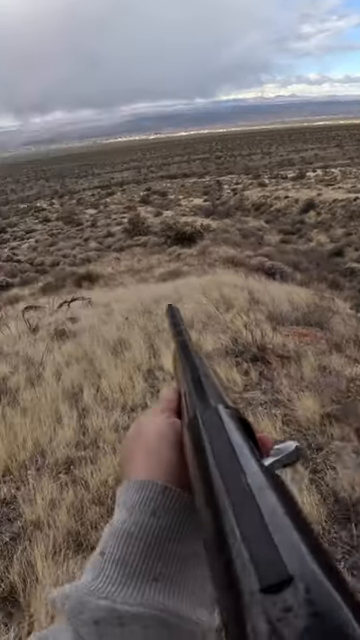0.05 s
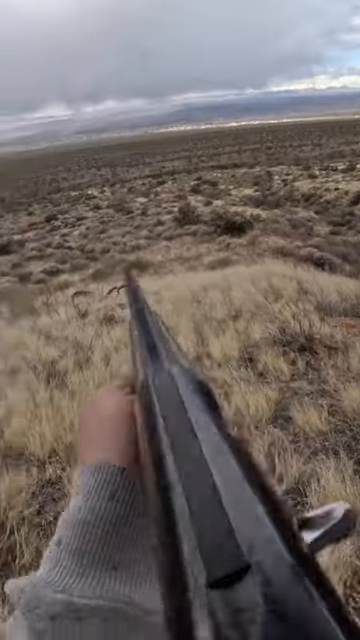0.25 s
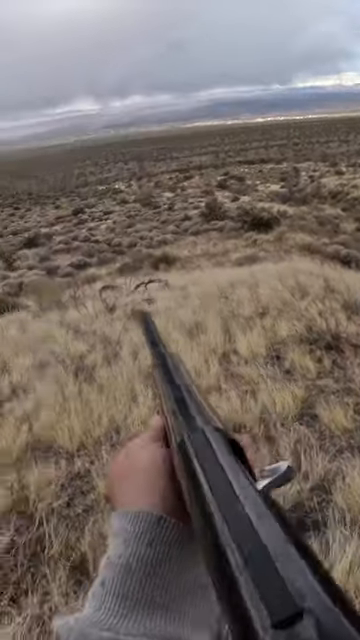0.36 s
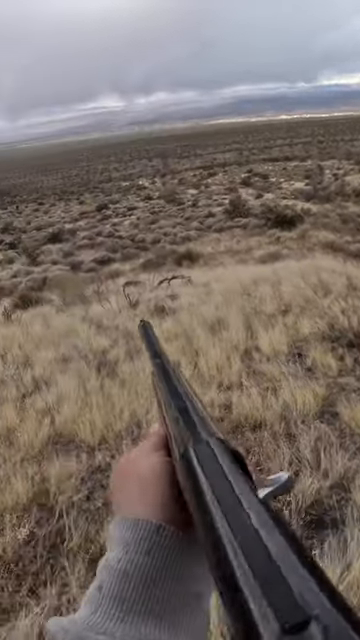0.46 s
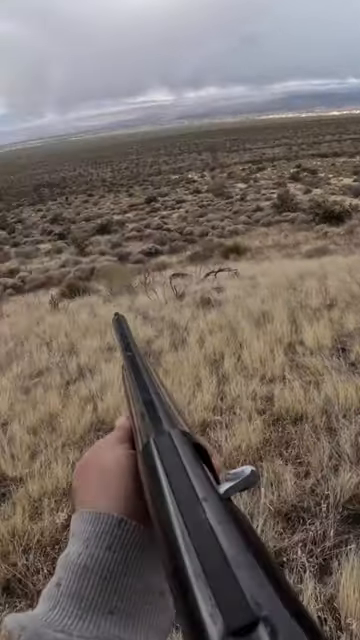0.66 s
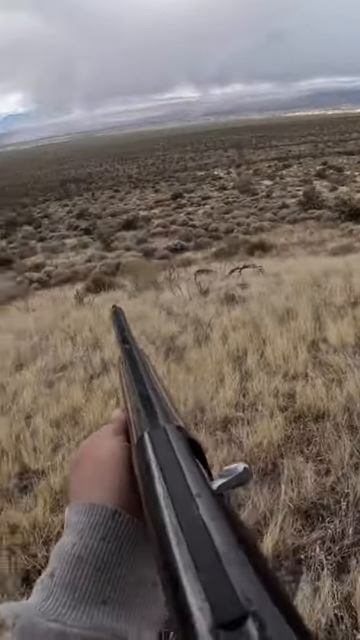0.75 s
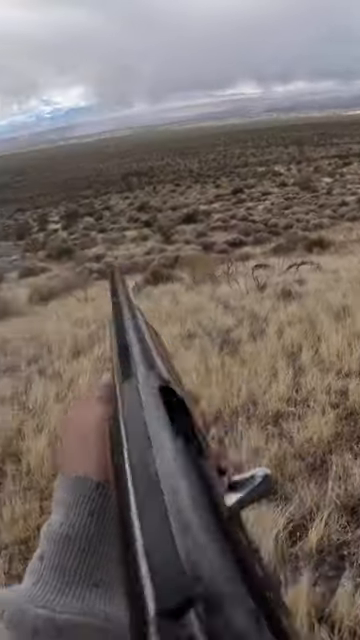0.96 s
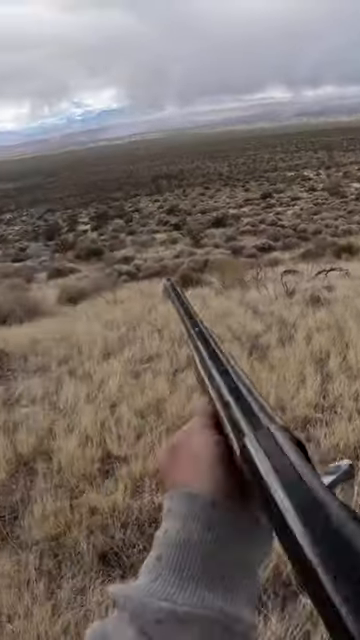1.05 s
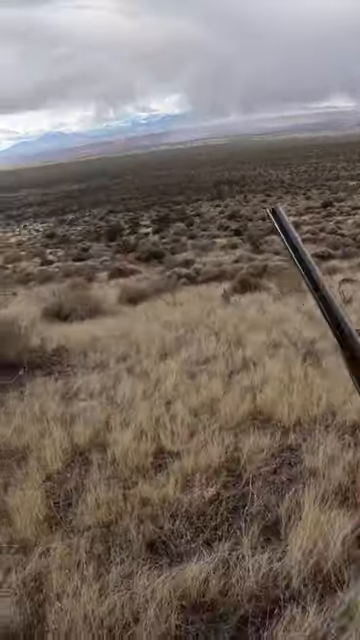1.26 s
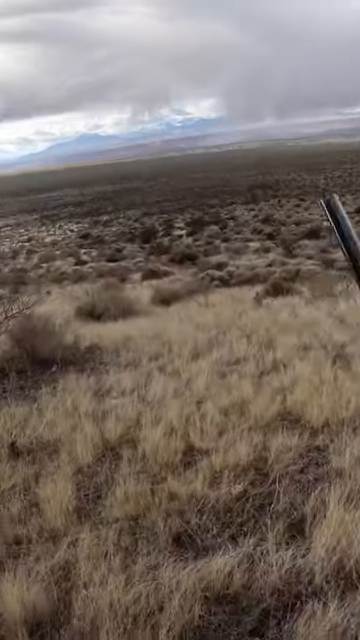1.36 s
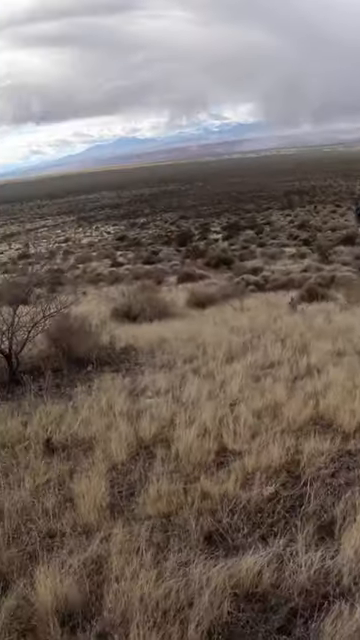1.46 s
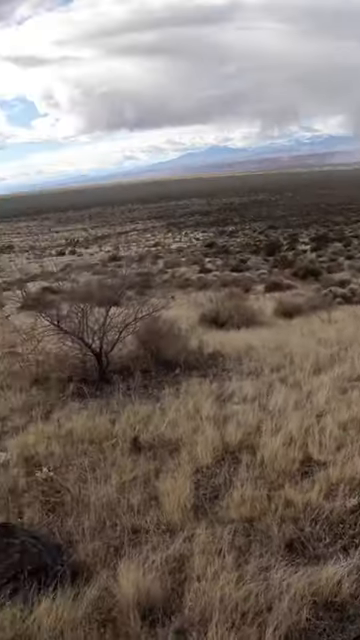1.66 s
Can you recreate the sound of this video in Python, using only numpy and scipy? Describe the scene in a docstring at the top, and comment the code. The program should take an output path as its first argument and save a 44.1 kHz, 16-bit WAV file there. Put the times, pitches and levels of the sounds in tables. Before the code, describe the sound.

A loud, close shotgun blast goes off at about 0.2 seconds and echoes across an open hillside, with a faint metallic clack of the action at 0.4. A second blast follows at 0.9 seconds, with another clack just after 1.0. Its echo fades by about 1.5 seconds, leaving low wind on the microphone, a soft rustle of cloth and grass, and a couple of faint clicks.

```python
"""Two shotgun blasts boom and roll away over an open hillside, heard by a small camera behind the gun.
Each swells in as a rough ring of steel, then breaks in a low blast of air with three quick reflections.
Echoes scatter off the slope while the action (the gun's moving parts) clacks shut.
Wind rumbles on the microphone, and cloth and grass rustle."""
import sys
import numpy as np
from scipy import signal
from scipy.fft import rfft, irfft
from scipy.io import wavfile
from scipy.ndimage import uniform_filter1d

SR = 44100
rng = np.random.default_rng(int(sys.argv[2]) if len(sys.argv) > 2 else 0)


def generate_wav(signal):
    """Clip the signal to [-1, 1] and save it as 16-bit WAV at the path in sys.argv[1]."""
    frames = np.transpose(np.atleast_2d(signal))
    scaled = np.clip(frames, -1, 1) * 32767
    pcm = np.round(scaled).astype(np.int16)
    wavfile.write(sys.argv[1], SR, pcm)


N = 74970

# the two shots: (blast time [s], swell length [s], ring level [dB], blast level [dB], thud level [dB])
SHOTS = [(.2362, .029, -12.5, -3.5, -11), (.9066, .017, -14, -4.5, -17)]
# tone of the roaring gas: (frequency [Hz], level [dB])
GAS_ROAR = [(59, -19.5), (100, -29), (1060, -9), (1660, -11), (2130, -11), (4370, -14), (5510, -21.5),
            (9950, -24.5), (15500, -43.5)]


def undb(db):
    """Turn decibels into a gain to multiply by."""
    return 10 ** (np.asarray(db, float) / 20)


def unit(x):
    """Scale a sound to an average (rms) level of 1."""
    return x / np.sqrt(np.mean(x ** 2))


def clock():
    """The time of every sample, in seconds."""
    return np.arange(N) / SR


def coloured(points):
    """Noise at level 1, its tone shaped by (frequency [Hz], level [dB]) points."""
    hz, db = np.array(points).T
    freqs = np.maximum(np.fft.rfftfreq(N, 1 / SR), 1)
    gain = undb(np.interp(np.log(freqs), np.log(hz), db))
    return unit(irfft(rfft(rng.standard_normal(N)) * gain, N))


def band(x, lo_hz, hi_hz):
    """Keep the sound between two frequencies."""
    return signal.sosfilt(signal.butter(2, [lo_hz, min(hi_hz, .45 * SR)], "band", fs=SR, output="sos"), x)


def resonate(x, hz, width_hz):
    """Make a sound ring at one pitch; a narrower width rings longer."""
    return signal.lfilter(*signal.iirpeak(hz, hz / width_hz, fs=SR), x)


def wander(per_second):
    """Glide between random values, typically of size 1."""
    step = int(SR / per_second)
    held = np.repeat(rng.standard_normal(N // step + 1), step)
    return unit(uniform_filter1d(held, step)[:N])


def curve(rows):
    """Join (time [s], level [dB]) points with straight lines."""
    return np.interp(clock(), *np.array(rows).T)


def blast():
    """A short push and longer pull of air with a spit of hiss, arriving four times and waking a boom."""
    # direct, then off the ground, bushes and near slope: (delay [s], level [dB], hiss level [dB])
    arrivals = [(0, 0, -13), (.0066, .5, -17), (.0105, -8, -24), (.0213, -7, -18)]
    # low tones woken by the blast: (frequency [Hz], width [Hz], relative level [dB])
    boom_tones = [(153, 20, -12.5), (285, 91, -31.5), (535, 240, 3), (950, 470, 11)]
    push_s, pull_s, hiss_fade_s = .0012, .0026, .049  # a fade time is the time to drop 60 dB
    t, air, hiss_level = clock(), 0, 0
    for at, _, _, db, _ in SHOTS:
        for delay, arrival_db, hiss_db in arrivals:
            age = t - at - delay
            push = np.sin(np.pi * np.clip(age / push_s, 0, 1))
            pull = np.sin(np.pi * np.clip((age - push_s) / pull_s, 0, 1))
            air += undb(db + arrival_db) * (push - .8 * pull)
            hiss_level += (age > 0) * undb(db + hiss_db - 60 * np.maximum(age, 0) / hiss_fade_s)
    boom = sum(undb(db) * resonate(air, hz, width) for hz, width, db in boom_tones)
    return air + undb(-5) * boom + hiss_level * coloured(GAS_ROAR)


def steel_ring():
    """Ringing steel and roaring gas swell up to each blast, then die fast; a low thud joins in."""
    # tones of the gun's barrel and body: (frequency [Hz], width [Hz], relative level [dB])
    steel_tones = [(310, 40, -4), (430, 30, -8), (600, 40, -8), (775, 35, -8), (1080, 30, 0), (2200, 28, 0),
                   (2770, 30, -6), (3045, 28, -3), (3610, 28, -5), (4360, 26, -2), (5020, 35, -8),
                   (5950, 30, -9), (6510, 40, -13), (7640, 30, -15), (8860, 40, -14), (10000, 150, -17)]
    onset_s, swell_db, ring_fade_s = .025, 6, .035
    thud_hz, thud_lead_s, thud_fade_s = 150, .03, .05
    steel, level, thud = 0, 0, 0
    for hz, width, db in steel_tones:
        tone = resonate(rng.standard_normal(N), hz, width)
        steel += undb(db) * unit(resonate(tone, hz, 2 * width))
    for at, swell_s, ring_db, _, thud_db in SHOTS:
        age = clock() - at  # negative before the blast
        onset = np.clip((age + swell_s + onset_s) / onset_s, 0, 1) ** 3
        shape_db = np.where(age < .003, swell_db * age / swell_s, -60 * age / ring_fade_s)
        level += onset * undb(ring_db + shape_db)
        thud_rise = np.clip(age / thud_lead_s + 1, 0, 1)
        thud_fall = undb(thud_db - 60 * np.maximum(age, 0) / thud_fade_s)
        thud += thud_rise * thud_fall * np.cos(2 * np.pi * thud_hz * age)
    return level * (unit(steel) + undb(-3.5) * coloured(GAS_ROAR)) + thud


def hillside_echoes():
    """Scattered echoes blur into one fluttering wash of noise whose treble fades first."""
    # echo levels, one list per shot:
    # (time [s], bass [dB], middle [dB], upper middle [dB], treble [dB], top [dB])
    echo_levels = [
        [(.25, -21, -24, -26, -35, -45), (.268, -25, -32, -34, -44, -55), (.295, -31, -35, -43, -54, -64),
         (.37, -34, -38, -43, -53, -64), (.44, -30, -38, -43, -58, -70), (.51, -31, -37, -43, -58, -74),
         (.6, -37, -44, -49, -68, -88), (.75, -41, -49, -56, -80, -100), (.87, -45, -60, -68, -92, -110)],
        [(.92, -20, -24, -27, -37, -46), (.948, -27, -34, -35, -47, -58), (.976, -31, -35, -39, -53, -63),
         (1.01, -28, -35, -44, -54, -64), (1.045, -36, -37, -42, -53, -64), (1.17, -35, -41, -44, -61, -76),
         (1.2, -39, -47, -50, -65, -82), (1.33, -44, -52, -57, -74, -92), (1.5, -52, -62, -66, -86, -105)],
    ]
    # centres of those five ranges: (frequency [Hz])
    range_hz = (200, 800, 2700, 7500, 12500)
    # tone of the wash before those levels shape it: (frequency [Hz], level [dB])
    echo_colour = [(50, -48), (110, -27.5), (170, -22), (350, -27), (800, -29), (1400, -35.5), (2700, -33),
                   (4300, -35), (7500, -40.5), (12500, -36), (15500, -61)]
    delay_s, rise_s, flutter_db, tail_db_per_s = .008, .016, 2, 90
    t, echoes = clock(), 0
    octaves = np.log2(np.maximum(np.fft.rfftfreq(N, 1 / SR), 1))
    hz, db = np.array(echo_colour).T
    wash = rfft(rng.standard_normal(N)) * np.sqrt(SR / 2) * undb(np.interp(octaves, np.log2(hz), db))
    for centre in np.arange(16, 43) / 3:  # bands a third of an octave apart
        level = 0
        for rows, (at, *_) in zip(echo_levels, SHOTS):
            times = [row[0] for row in rows]
            band_db = [np.interp(centre, np.log2(range_hz), row[1:]) for row in rows]
            rise = np.clip((t - at - delay_s) / rise_s, 0, 1)
            tail = undb(-tail_db_per_s * np.maximum(t - times[-1], 0))
            level += rise * tail * undb(np.interp(t, times, band_db))
        in_band = np.clip(1 - 3 * abs(octaves - centre), 0, 1)
        echoes += level * irfft(wash * in_band, N)
    return echoes * undb(flutter_db * wander(70))


def action_clacks():
    """Each knock of metal parts rings the tones nearest its brightness, with a short rattle."""
    # knocks: (time [s], level [dB], brightness [Hz], fade time [s], rattle against tone [dB])
    knocks = [(.370, -34.5, 12400, 0.017, -10), (.3785, -24, 1480, 0.019, 3),
              (.3862, -13.5, 4200, 0.0067, 2), (.388, -25, 3640, 0.034, -3.5), (.390, -22, 2250, 0.033, 3),
              (.389, -22, 1110, 0.021, 6), (.398, -30, 11000, 0.0065, -4), (.719, -38, 808, 0.032, 1),
              (.963, -37.5, 8000, 0.014, -5), (1.0187, -22.5, 5330, 0.0061, 8.5),
              (1.0265, -17.5, 3240, 0.035, 0.5), (1.029, -15, 1190, 0.018, -0.5),
              (1.0305, -29, 4700, 0.022, 5), (1.0525, -40.5, 4450, 0.023, 7),
              (1.333, -28.5, 1230, 0.053, -1), (1.618, -34.5, 1130, 0.11, -3.5),
              (1.638, -40, 2240, 0.032, -9)]
    # natural tones of the moving parts: (frequency [Hz], relative level [dB])
    metal_tones = [(1180, 29), (2130, 9), (3050, -1.5), (3710, 1), (5110, -9), (6300, -26), (8260, -2),
                   (9790, -12), (12200, -13)]
    spread_octaves, attack_s = .6, .00044
    t, clacks, noise = clock(), np.zeros(N), rng.standard_normal(N)
    all_phases = rng.random((len(knocks), len(metal_tones))) * 2 * np.pi
    for (at, db, bright_hz, fade_s, rattle_db), phases in zip(knocks, all_phases):
        span = slice(int(at * SR), int((at + fade_s) * SR))
        age = t[span] - t[span][0]
        tone = 0
        for (hz, tone_db), phase in zip(metal_tones, phases):
            nearness = np.exp(-(np.log2(hz / bright_hz) / spread_octaves) ** 2)
            tone += undb(tone_db) * nearness * np.sin(2 * np.pi * hz * age + phase)
        width = .77 * bright_hz
        rattle = unit(resonate(resonate(noise[span], bright_hz, width), bright_hz, width))
        attack = np.sin(np.pi / 2 * np.minimum(age / attack_s, 1)) ** 2
        fade = undb(db - 60 * age / fade_s)
        clacks[span] += .5 * attack * fade * (unit(tone) + undb(rattle_db) * rattle)
    return clacks


def wind():
    """Wind rumbles on the microphone and buffets it in lumps as the gun is lowered."""
    # deep rumble: (time [s], level [dB])
    rumble_levels = [(0.0, -33.5), (0.198, -42), (0.254, -51), (0.278, -41.5), (0.828, -44), (0.894, -33),
                     (1.22, -55), (1.344, -35), (1.68, -34), (1.7, -40)]
    # lumpy gusts: (time [s], level [dB])
    gust_levels = [(0, -44), (.18, -56), (1.2, -45), (1.35, -40), (1.45, -34), (1.55, -34), (1.62, -33),
                   (1.7, -31.5)]
    rumble = unit(band(band(rng.standard_normal(N), 11, 80), 28, 110))
    rumble *= undb(curve(rumble_levels) + 1.94 * wander(14.73))
    gusts = unit(band(rng.standard_normal(N), 90, 285))
    gusts *= undb(curve(gust_levels) + 1.9 * wander(35.36))
    return rumble + gusts


def rustle():
    """Cloth and grass make a soft, flickering noise."""
    # rise and fall of the rustle: (time [s], level [dB])
    levels = [(0, -50.5), (.05, -55.5), (.18, -60.5), (1.15, -48), (1.3, -55.5), (1.4, -45.5), (1.5, -50),
              (1.6, -45.5), (1.7, -46.5)]
    # its tone: (frequency [Hz], level [dB])
    colour = [(300, -16), (600, -1), (1100, 1), (1600, -5), (3300, -14), (6000, -36.5), (9000, -53.5),
              (14000, -65)]
    return band(coloured(colour), 334, 14000) * undb(curve(levels) + 2 * wander(90))


def air_hiss():
    """A faint hiss of air that slowly sinks."""
    # its tone: (frequency [Hz], level [dB])
    colour = [(1500, -29), (3000, -8), (6000, -14), (9500, -14), (11000, -33), (15000, -41)]
    start_db, fade_db_per_s = -74.5, 10.5
    return coloured(colour) * undb(start_db - fade_db_per_s * clock())


def scene():
    """Mix all sources in stereo; the microphone's two openings differ only around 12 kHz."""
    top_hz, lag_s = (11500, 14000), .0012
    mono = steel_ring() + blast() + hillside_echoes() + action_clacks() + wind() + rustle() + air_hiss()
    top = band(band(band(mono, *top_hz), *top_hz), *top_hz)
    side = undb(-3.5) * top + undb(-3) * np.roll(top, int(lag_s * SR))
    return np.array([mono + side, mono - side])


def record(dry):
    """The camera rounds off the loudest peaks and cuts the highest treble."""
    ceiling, cutoff_hz = .98, 15550
    rounded = dry / (1 + abs(dry / ceiling) ** 4) ** .25
    return signal.sosfilt(signal.ellip(12, .2, 100, cutoff_hz, fs=SR, output="sos"), rounded)


dry = scene()
out = record(dry)
generate_wav(out)
```